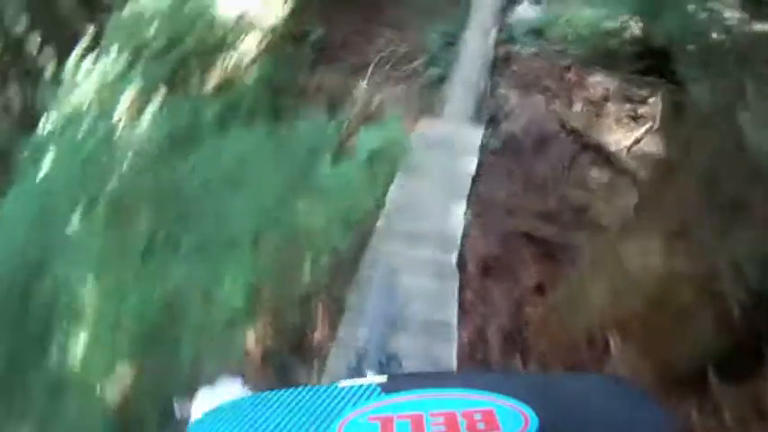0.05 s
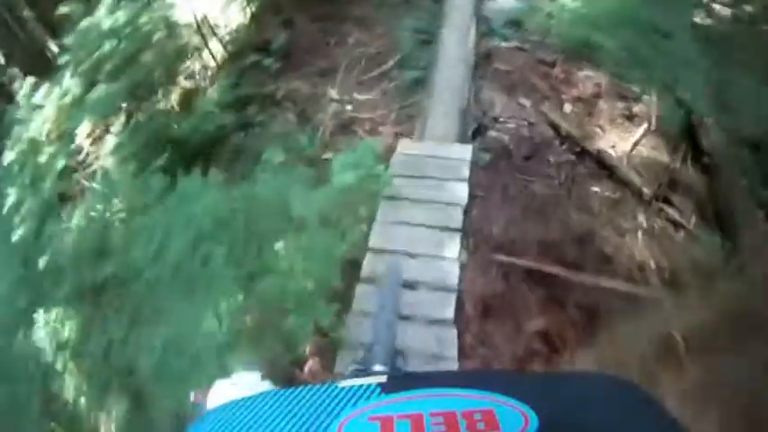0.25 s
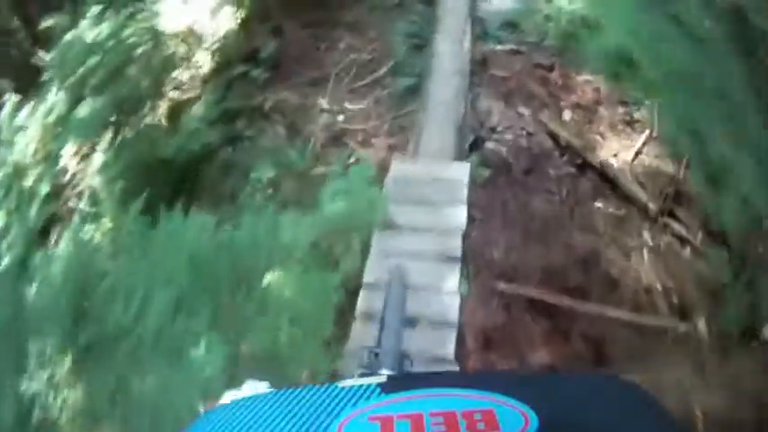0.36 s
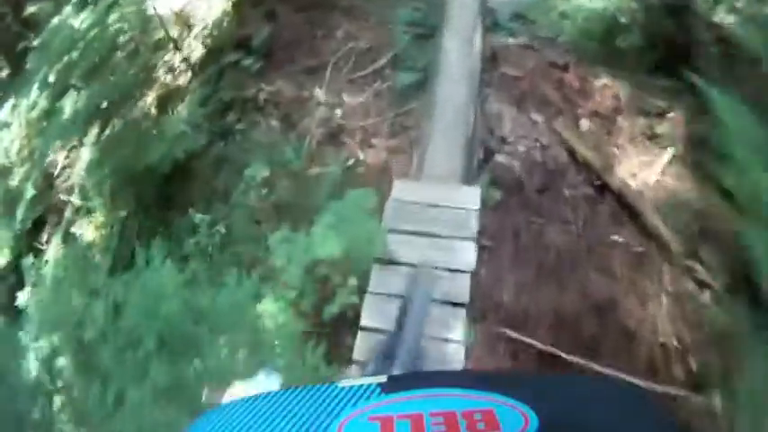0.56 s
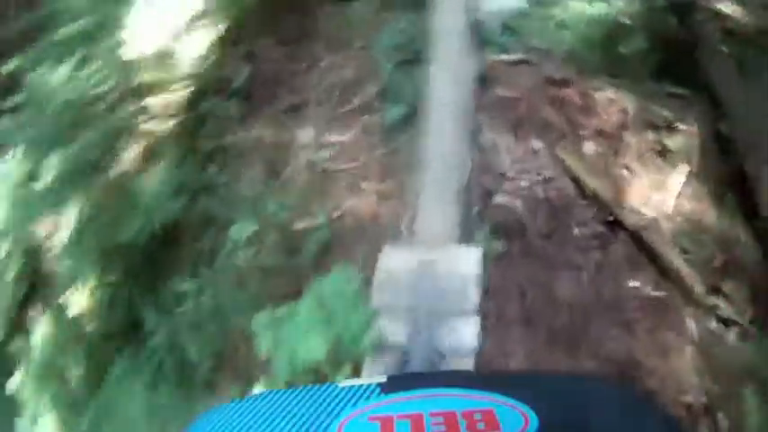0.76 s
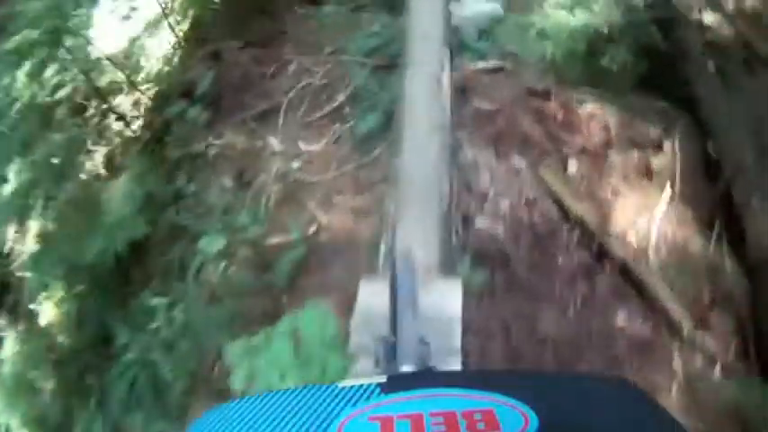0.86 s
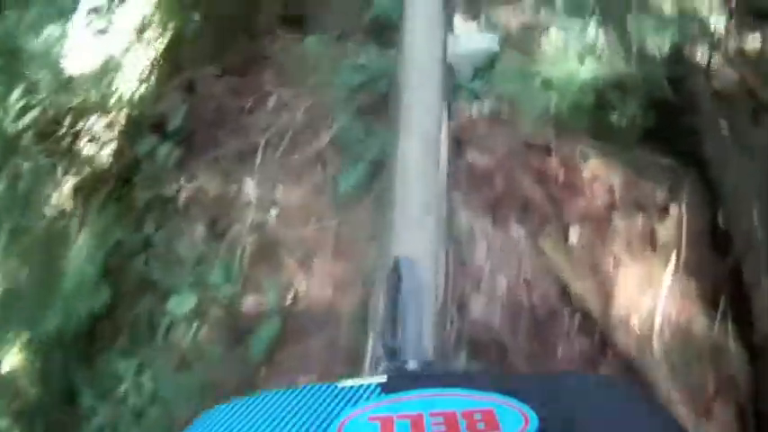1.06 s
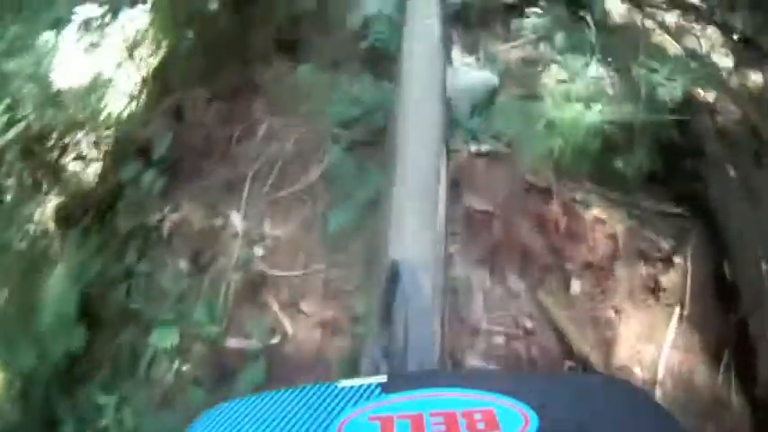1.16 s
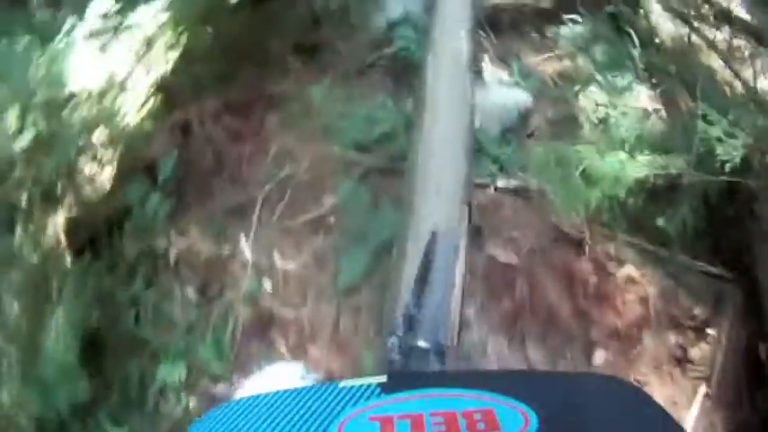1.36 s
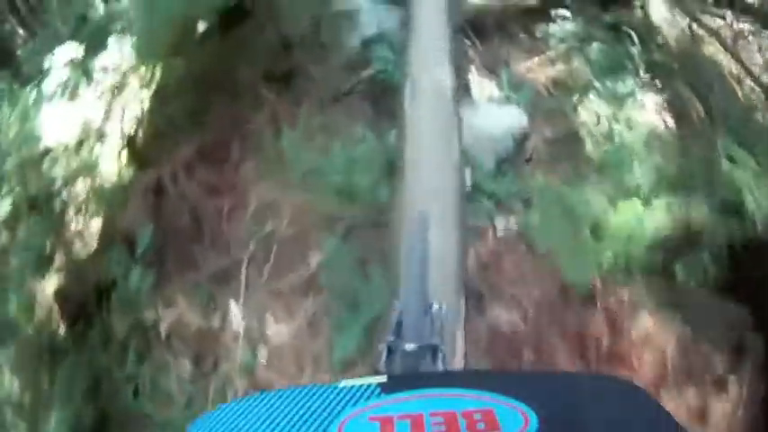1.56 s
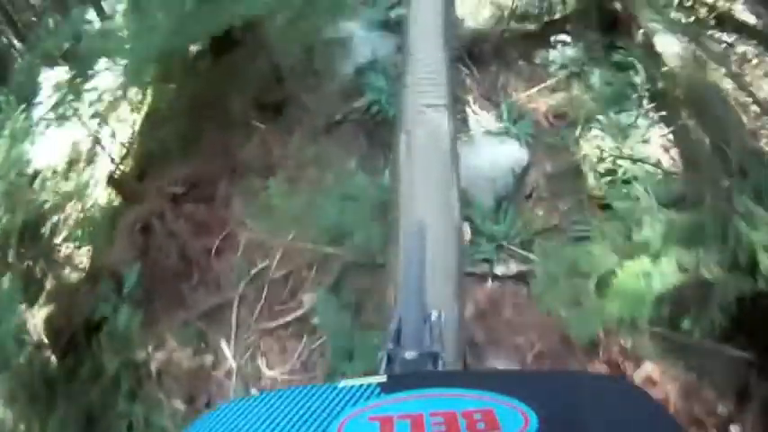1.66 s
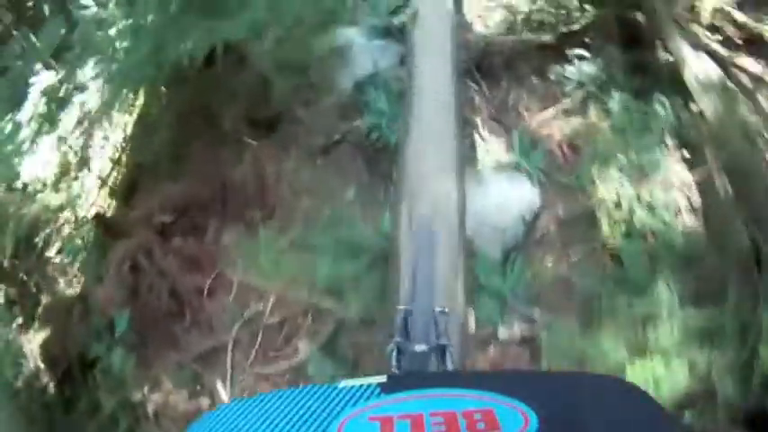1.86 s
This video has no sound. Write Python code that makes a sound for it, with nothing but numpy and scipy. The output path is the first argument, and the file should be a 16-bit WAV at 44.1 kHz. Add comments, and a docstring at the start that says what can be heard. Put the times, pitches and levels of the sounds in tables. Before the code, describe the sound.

Mountain bike tyres scuff and creak over wooden slats and a log, with low rumble.

```python
"""Tyres scuff and creak close by, in short grainy bursts over a deep rumble: a mountain bike rolls over
a slatted wooden ramp and on along a log. The microphone rides on the helmet, shut in a camera case
that rings with the friction of tyres and gear. Two drops land as soft thumps and the wood gives a few
hollow knocks; the bike ticks and rubber squeaks faintly. The recorder holds its samples at a low rate,
which mirrors everything into a thin treble sheen."""
import sys
import numpy as np
from scipy import signal
from scipy.fft import rfft, irfft
from scipy.io import wavfile
from scipy.ndimage import uniform_filter1d

SR = 44100
rng = np.random.default_rng(int(sys.argv[2]) if len(sys.argv) > 2 else 0)


def file_out(sig):
    """Save sig as 16-bit WAV at sys.argv[1]."""
    # one column per channel
    cols = np.atleast_2d(sig).T
    # limit, then scale
    lim = np.clip(cols, -1, 1)
    pcm = np.round(lim * 32767).astype(np.int16)
    wavfile.write(sys.argv[1], SR, pcm)


N = 83790
TIME = np.arange(N) / SR

# Colours of the air, a wide wash and the helmet rumble. Each row: frequency in Hz, relative density in dB.
AIR_SPECTRUM = [(80, 6.5), (140, 7), (220, 2.5), (320, -0.5), (550, -3), (1000, -9), (2000, -13),
                (3000, -16), (4500, -18), (5500, -15.5)]
WASH_SPECTRUM = [(150, -13.5), (500, 8.5), (2000, -5), (4500, 7), (6000, -5.5), (7500, 3.5), (9000, -12.5),
                 (10500, -24), (15000, -38)]
RUMBLE_SPECTRUM = [(12, -15.5), (25, 0.5), (40, -0.5), (50, -16), (63, -2), (70, -5), (79, -36),
                   (100, -29.5), (200, -56)]
# Shaking of the helmet. Each row: time in seconds, level in dB.
SHAKE_LEVELS = [(0, -49.5), (.25, -47), (.37, -51.5), (.46, -43), (.57, -41), (.68, -50), (.82, -49.5),
                (.86, -42), (1.0, -42), (1.07, -36.5), (1.18, -36.5), (1.25, -50), (1.42, -44),
                (1.5, -42.5), (1.58, -41), (1.72, -53), (1.86, -46.5)]
# Rubber squeaks, and one hum of the tread on the log.
# Each row: start and length in seconds, first and last pitch in Hz.
SQUEAK_GLIDES = [(1.085, .07, 1170, 1210), (1.37, .068, 1550, 1510)]
TREAD_GLIDE = (1.09, .24, 170, 235)
# Ticks from the bike. Each row: start in seconds, level in dB, decay in seconds, low edge in Hz.
BIKE_TICKS = [(0.045, -37.5, 0.00068, 1090), (1.029, -49, 0.0062, 4800), (1.0646, -46.5, 0.0042, 2000),
              (1.761, -51.5, 0.0094, 2580)]
# Knocks, each on another piece of wood.
# Each row: start in seconds, level in dB, pitch in Hz, time to fall 60 dB in seconds.
WOOD_KNOCKS = [(0.191, -49, 156.5, 0.23), (0.693, -41, 144, 0.12), (1.554, -43, 125, 0.075)]
# Modes of the wood. Each row: multiple of the pitch, gain in dB.
WOOD_MODES = [(.76, -15.5), (1.001, 1), (1.33, -12.5)]
# The wheels drop off an edge. Each row: start in seconds, strength in dB, extra mount ringing in dB.
WHEEL_DROPS = [(0.615, -12, 2), (1.504, -18, -1.5)]
# Resonances of the case around the microphone. Each row: frequency in Hz, width in Hz, gain in dB.
CASE_LOW_MODES = [(731.5, 65, -5), (969, 124, -0.5), (1174, 183, -3), (1425, 120, -4)]
CASE_MID_MODES = [(1644, 60, -1.5), (1793, 205, -1), (1960, 260, 1), (2438, 220, -4.5)]
CASE_TOP_MODES = [(2930, 84, -7), (3495, 346, -9), (3822, 346, -11)]
# Sharp creaks. Each row: start in seconds, first slip in dB, extra dB in the low and top case modes.
CREAK_RUNS = [(.043, -34, 7, 2), (.116, -8.5, -3, -13), (.5225, -8, -4, -27), (1.1609, -21, -4, 17.5)]
# Tyre noise between the scuffs. Each row: time in seconds, level in dB.
ROLLING_LEVELS = [(0, -57), (.16, -71), (.34, -68.5), (.5, -64.5), (.68, -64.5), (.86, -68.5), (.97, -69.5),
                  (1.05, -60), (1.14, -61), (1.22, -60), (1.31, -64), (1.41, -64), (1.49, -60), (1.66, -65),
                  (1.8, -71.5), (1.9, -66)]
# Scuffs of tyres and gear.
# Each row: start, hold and fade in seconds, level in dB, extra dB in the low and top case modes.
SCUFF_BURSTS = [(0.0, 0.044, 0.0078, -56.5, -3, 2), (0.089, 0.058, 0.036, -62, -0.5, 0),
                (0.173, 0.046, 0.0055, -66.5, 6.5, 4), (0.266, 0.026, .005, -61.5, -5, -2),
                (0.444, 0.015, 0.0072, -56, -3.5, -9), (.491, 0.036, 0.017, -53, -2.5, 2),
                (0.564, 0.034, 0.0068, -53, -5, 1), (0.606, 0.022, .004, -57, 5, 0),
                (0.653, 0.02, .013, -60, 4, 0), (0.732, 0.017, 0.0033, -57.5, -1, -9),
                (0.791, .022, 0.0057, -61, -4, -1.5), (0.998, 0.0075, 0.0044, -49, -10, 1.5),
                (1.008, 0.017, 0.015, -57.5, -1, 4), (1.079, 0.017, 0.0083, -54, 0, 0),
                (1.142, 0.026, 0.0048, -48.5, -0.5, 2.5), (1.171, 0.012, .004, -61, 13, 5),
                (1.223, 0.033, 0.018, -52.5, 0, 1.5), (1.344, 0.019, 0.0056, -60, 6, 1),
                (1.434, .012, 0.0046, -49.5, -6.5, -7), (1.537, 0.033, 0.0027, -49.5, -3.5, 0),
                (1.606, 0.022, 0.024, -53, -4, -4), (1.743, .022, 0.0082, -60.5, -3.5, -2)]


def from_db(db):
    return 10 ** (np.asarray(db) / 20)


def unit_rms(x):
    return x / np.sqrt(np.mean(x ** 2) + 1e-20)


def fader(rows):
    """Gain over time, through points of seconds and dB."""
    return from_db(np.interp(TIME, *np.transpose(rows)))


def butter(x, hz, kind, order=2):
    return signal.sosfilt(signal.butter(order, hz, kind, fs=SR, output="sos"), x)


def noise(spectrum):
    """Noise of rms 1 with the given colour."""
    hz, db = np.transpose(spectrum)
    bin_hz = np.maximum(np.arange(N // 2 + 1) * SR / N, 1)
    colour = from_db(np.interp(np.log(bin_hz), np.log(hz), db))
    return unit_rms(irfft(rfft(rng.standard_normal(N)) * colour, N))


def push(start, length_s):
    """A soft half-sine contact of area 1."""
    shape = np.sin(np.pi * np.clip((TIME - start) / length_s, 0, 1))
    return shape / (shape.sum() + 1e-9)


def ring(x, hz, t60):
    """One mode: a click sets a sine ringing, 60 dB down after t60 seconds."""
    radius = np.exp(-np.log(1000) / (t60 * SR))
    angle = 2 * np.pi * hz / SR
    return signal.lfilter([0, np.sin(angle)], [1, -2 * radius * np.cos(angle), radius ** 2], x + 1e-18)


def resonate(x, modes):
    """Parallel resonances with alternating signs."""
    out = 0
    for k, (hz, width, db) in enumerate(modes):
        radius = np.exp(-np.pi * width / SR)
        poles = [1, -2 * radius * np.cos(2 * np.pi * hz / SR), radius ** 2]
        gain = (-1) ** k * from_db(db) * (1 - radius ** 2) / 2
        out += gain * signal.lfilter([1, 0, -1], poles, x + 1e-18)
    return out


def camera_case(low, mid, top):
    """The case rings around the microphone in three groups of modes and shuts out the treble."""
    modes = resonate(low, CASE_LOW_MODES) + resonate(mid, CASE_MID_MODES) + resonate(top, CASE_TOP_MODES)
    return butter(modes, 4300, "low", order=12)


def wide_wash(db=-78.5):
    """A faint, wide wash of low-mid noise with a thin hiss above it."""
    return from_db(db) * np.array([noise(WASH_SPECTRUM), noise(WASH_SPECTRUM)])


def air(db=-60):
    """A faint, steady bed of air behind the ride."""
    return from_db(db) * noise(AIR_SPECTRUM)


def helmet_rumble():
    """Helmet and mount shake the microphone, following the roughness of the ride."""
    shake = noise(RUMBLE_SPECTRUM)
    running_rms = np.sqrt(uniform_filter1d(shake ** 2, size=4000))
    return fader(SHAKE_LEVELS) * shake / running_rms


def glide(start, length, first_hz, last_hz, db, waver_hz, flutter_db=4):
    """A rough, unsteady tone that swells and fades while its pitch slides."""
    progress = np.clip((TIME - start) / length, 0, 1)
    waver, flutter = unit_rms(butter(rng.standard_normal((2, N)), 129, "low"))
    hz = first_hz + (last_hz - first_hz) * progress + waver_hz * waver
    swell = np.sqrt(np.abs(np.sin(np.pi * progress)))
    return from_db(db + flutter_db * flutter) * swell * np.sin(2 * np.pi * np.cumsum(hz) / SR)


def rubber():
    """Rubbing rubber squeaks faintly, and the tread hums on the log with a rising pitch."""
    squeaks = sum(glide(*row, db=-59.5, waver_hz=48.4) for row in SQUEAK_GLIDES)
    return squeaks + glide(*TREAD_GLIDE, db=-63, waver_hz=8.7)


def bike_ticks(top_hz=8500):
    """Tiny bright bursts from the bike below that die at once."""
    out = 0
    for start, db, decay, low_hz in BIKE_TICKS:
        envelope = from_db(db) * (TIME >= start) * np.exp(-np.abs(TIME - start) / decay)
        out += butter(envelope * rng.standard_normal(N), [low_hz, top_hz], "band")
    return out


def wood_knocks(contact_s=0.0033):
    """A wheel strikes the wood softly and it rings low and hollow."""
    return sum(from_db(db + mode_db) * ring(push(start, contact_s), hz * ratio, t60)
               for start, db, hz, t60 in WOOD_KNOCKS for ratio, mode_db in WOOD_MODES)


def drop_thumps(push_s=0.016, mount_lag_s=0.0193, mount_db=-11.5):
    """Each drop sways the helmet; the mount follows and keeps ringing, right at the microphone."""
    out = 0
    for start, db, extra_db in WHEEL_DROPS:
        sway = ring(push(start, push_s), hz=36.2, t60=0.0686)
        mount = ring(push(start + mount_lag_s, push_s), hz=64.5, t60=0.52)
        out += from_db(db) * (sway + from_db(mount_db + extra_db) * mount)
    return butter(out, (18, 85), "band", order=3)


def creaks(slip_count=3, gap_s=0.0021, loss_db=6):
    """Quick runs of slips, each weaker than the last, set the case ringing."""
    slips = np.zeros((3, N))
    for start, db, low_db, top_db in CREAK_RUNS:
        for k in range(slip_count):
            at = int((start + gap_s * (k + rng.uniform(-0.12, 0.19))) * SR)
            slips[:, at] += from_db(db - loss_db * k) * from_db([low_db, 0, top_db])
    return camera_case(*slips)


def tyre_scuffs(grains_per_s=2500, spread_db=1.5, smooth_gain=0.68, attack_s=0.0058):
    """Dense friction grains ring in the case, softly while rolling and harder in each scuff."""
    sizes = from_db(spread_db * np.minimum(rng.exponential(1, N), 4)) * rng.choice([-1, 1], N)
    grains = unit_rms(sizes * (rng.random(N) < grains_per_s / SR))
    friction = grains + smooth_gain * rng.standard_normal(N)
    # Even out chance swells, so rolling and scuffs set the level at the microphone.
    ringing = camera_case(friction, friction, friction)
    friction /= np.sqrt(uniform_filter1d(ringing ** 2, size=600))
    power = (fader(ROLLING_LEVELS) * from_db([[0.5], [0], [0]])) ** 2  # low, mid and top modes
    for start, hold, fade, db, low_db, top_db in SCUFF_BURSTS:
        rise = np.clip((TIME - start) / attack_s + 0.5, 0, 1)
        fall = np.exp(-np.maximum(TIME - start - hold, 0) / fade)
        power += (from_db(db) * rise * fall * from_db([[low_db], [0], [top_db]])) ** 2
    return camera_case(*(friction * np.sqrt(power)))


def scene():
    """The ride is the same in both channels, so it sits dead centre."""
    ride = tyre_scuffs() + creaks() + bike_ticks() + rubber()
    ride += helmet_rumble() + drop_thumps() + wood_knocks() + air()
    return np.array([ride, ride])


def record(dry, anti_alias_hz=5400, hold_hz=12000, cutoff_hz=15350):
    """Held samples mirror the sound into the treble; a faint wash is added and the top is cut."""
    band_limited = butter(dry, anti_alias_hz, "low", order=14)
    slow = signal.resample_poly(band_limited, hold_hz, SR, axis=1, window=("kaiser", 3))
    steps = np.repeat(slow, 8, axis=1)
    held = signal.resample_poly(steps, SR, 8 * hold_hz, axis=1)[:, :N]
    top_cut = signal.ellip(10, 0.1, 80, cutoff_hz, fs=SR, output="sos")
    return signal.sosfilt(top_cut, held + wide_wash())


dry = scene()
out = record(dry)
file_out(out)
```